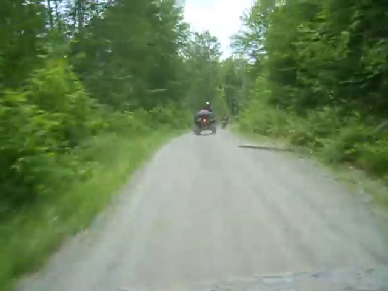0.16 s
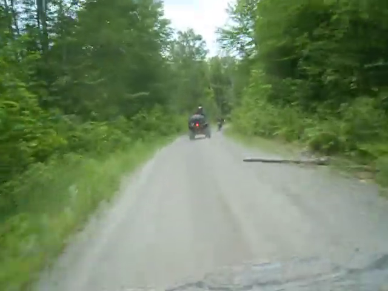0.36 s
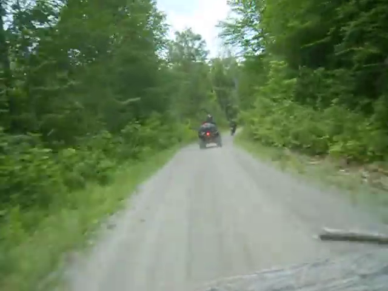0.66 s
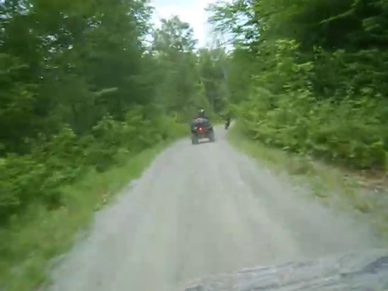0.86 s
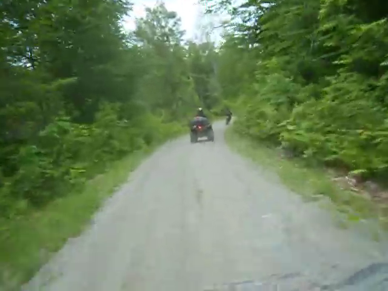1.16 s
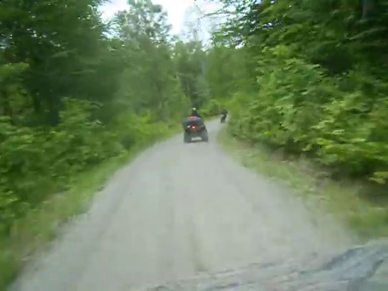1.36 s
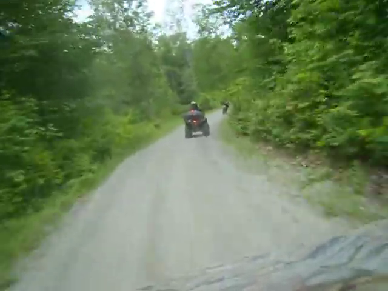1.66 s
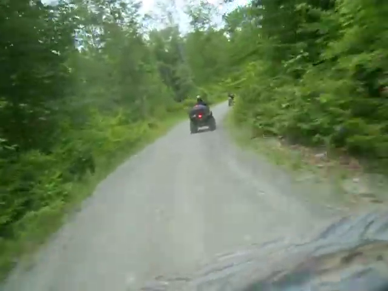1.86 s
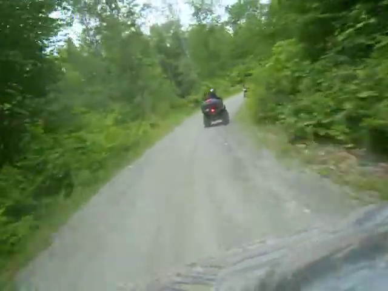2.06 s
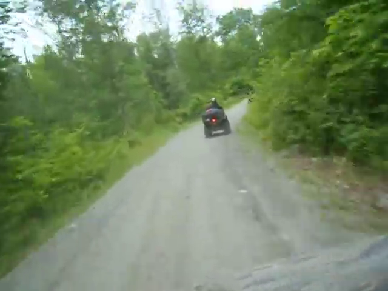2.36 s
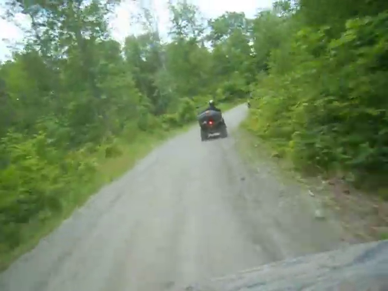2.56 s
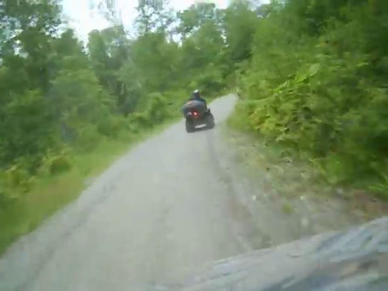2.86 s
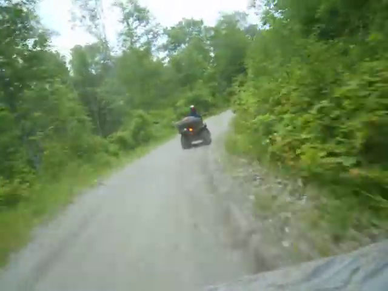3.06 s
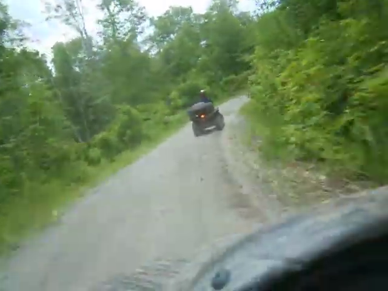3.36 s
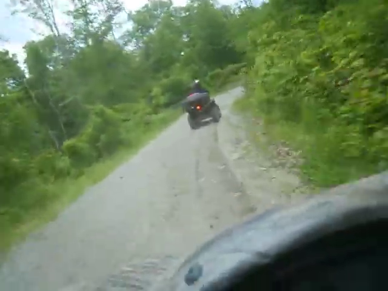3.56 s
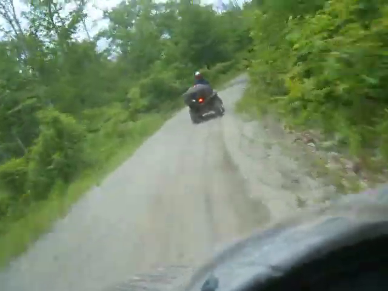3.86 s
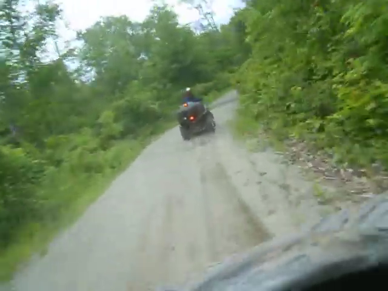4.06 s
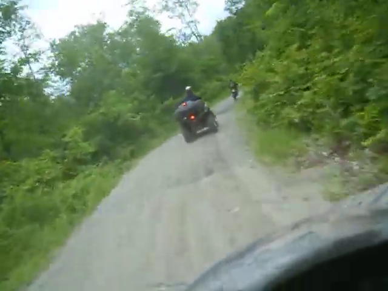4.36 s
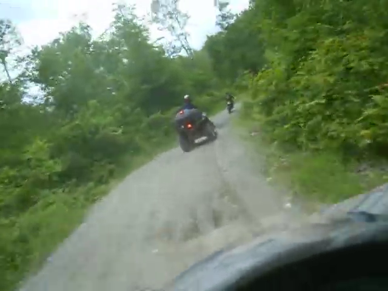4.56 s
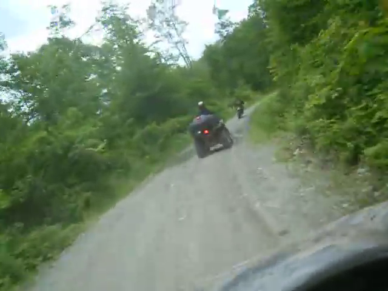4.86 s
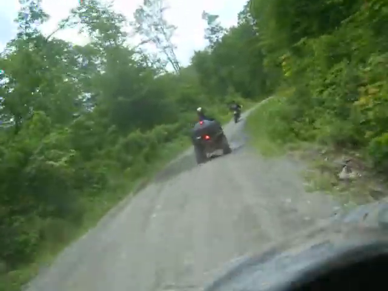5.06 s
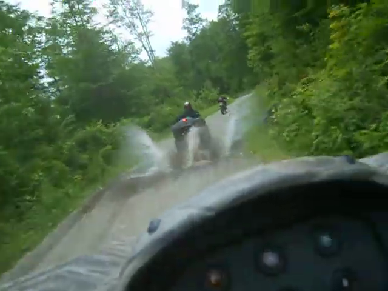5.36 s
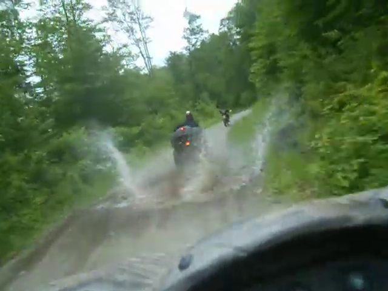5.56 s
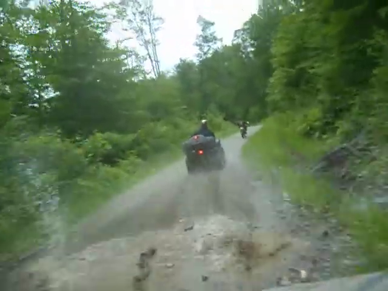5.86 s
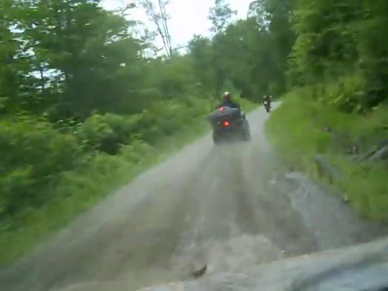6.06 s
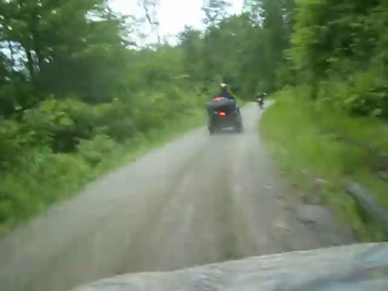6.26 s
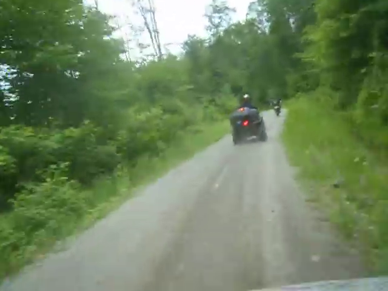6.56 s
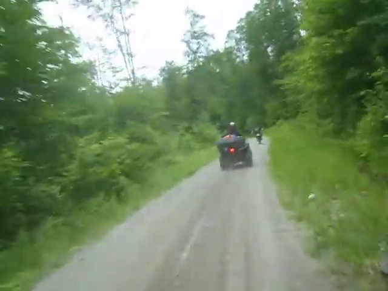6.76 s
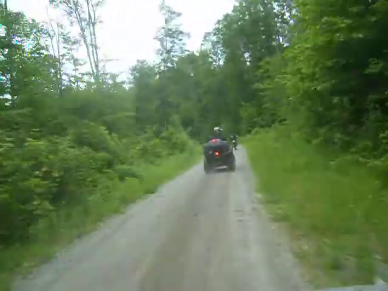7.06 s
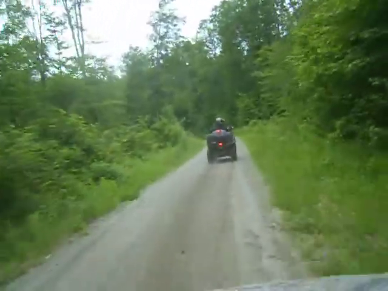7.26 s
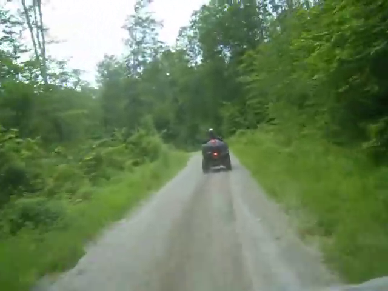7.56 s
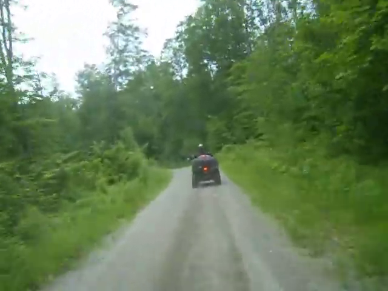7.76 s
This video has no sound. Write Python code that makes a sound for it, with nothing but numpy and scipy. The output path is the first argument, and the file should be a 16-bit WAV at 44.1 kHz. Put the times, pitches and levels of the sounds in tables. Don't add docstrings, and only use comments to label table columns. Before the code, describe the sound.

Close, from the cab of an open buggy on a gravel forest road: a twin-cylinder engine holds a high, loaded drone at first, with valve knocking, humming panels and thin whines over constant gravel hiss and low wind buffeting. At about 0.8 s a hard wind puff crackles and the throttle eases; the level ducks and slowly recovers. More wind hits cluster at 1.5-1.9 s as the engine pulls again around 2, then at 2.9. A short rev at 3.2 is followed by crackling gusts at 3.4-3.6. The engine sinks, quieter and lower, until about 5, with wind crackle near 4.8. It surges at 5.2, then closes off; a loose driveline part rattles brightly, loudest near 5.8, fading by 6.2. From 6.3 it accelerates, the drone and whines climbing loudly to the end. The sound is slightly saturated, with muted extreme treble.

```python
import sys
import numpy as np
from scipy import signal
from scipy.fft import rfft, irfft, next_fast_len
from scipy.io import wavfile
from scipy.ndimage import uniform_filter1d, map_coordinates

SR = 44100
rng = np.random.default_rng(int(sys.argv[2]) if len(sys.argv) > 2 else 0)


def attenuation_scalar(level_db):
    decades = np.asarray(level_db, float) / 20
    return 10 ** decades


def output_pcm(signal):
    pcm = np.clip(np.atleast_2d(signal).T, -1, 1) * 32767
    wavfile.write(sys.argv[1], SR, np.round(pcm).astype(np.int16))


N = 349272

# start_s, cycle_rate_hz
ENGINE_SPEED = [(0, 47.4), (.5, 47.89), (1.44, 47.52), (1.62, 45.72), (2.16, 44.83), (2.88, 43.52),
                (3.24, 47.52), (3.42, 46.76), (3.96, 40.51), (4.32, 37.8), (4.97, 35.6), (5.22, 43),
                (5.4, 46.28), (5.94, 38.59), (6.66, 43.7), (7.02, 46.75), (7.4, 47.68), (7.92, 49)]
# start_s, throttle (0-1)
PEDAL = [(0, 0.77), (.85, 0.26), (1.8, 0.32), (2.0, 0.75), (2.9, 0.52), (3.2, 0.84), (3.45, 0.45),
         (3.6, 0.31), (4.9, 0.1), (5.05, 0.71), (5.2, 1), (5.55, 0.69), (5.8, .05), (6.0, 0), (6.3, 0.55),
         (6.66, 0.78), (7.2, 0.99), (7.92, 0.96)]
# frequency_hz, level_db (per Hz)
GRAVEL_SPECTRUM = [(300, -27), (1000, 5), (2000, 1), (4200, -2), (5500, -5.5), (7000, -8.5), (9000, -10),
                   (20000, -27)]


def unit(x):
    return x / np.sqrt(np.mean(x ** 2) + 1e-20)


def curves(rows):
    s, *columns = np.transpose(rows)
    t = np.arange(N) / SR
    return [np.interp(t, s, column) for column in columns]


def wobble(rate_hz):
    at = np.arange(0, N + 16, 16)
    knots = rng.standard_normal(int(N * rate_hz / SR) + 4)
    return np.interp(np.arange(N), at, map_coordinates(knots, [at * rate_hz / SR]))


def filtered(x, response):
    m = next_fast_len(N + 8192)
    return irfft(rfft(x, m) * response(np.fft.rfftfreq(m, 1 / SR)), m)[:N]


def coloured(x, spectrum):
    hz, db = np.transpose(spectrum)
    return filtered(x, lambda f: attenuation_scalar(np.interp(np.log(f + 1), np.log(hz + 1), db)))


def rung(x, modes):
    def response(f):
        total = 0
        for k, (centre, width, db) in enumerate(modes):
            damping = 1j * f * width
            total = total + (-1) ** k * attenuation_scalar(db) * damping / (centre * centre - f * f + damping)
        return total
    return unit(filtered(x, response))


def peaks(f, modes):
    return sum(attenuation_scalar(db) / (1 + ((f - centre) / width) ** 4) for centre, width, db in modes)


def blows(turns, scatter_db, t60, click, soft):
    whole = np.floor(turns).astype(int)
    start = np.diff(whole, prepend=whole[0]) > 0
    age = (np.arange(N) - np.maximum.accumulate(np.arange(N) * start)) / SR
    size = attenuation_scalar(scatter_db * rng.standard_normal(whole.max() + 99))[whole]
    puff = attenuation_scalar(-60 * age / t60) * (1 - np.exp(-age / soft)) * rng.standard_normal(N)
    return size * (click * start + puff)


def spells(rows, rest_db):
    t = np.arange(0, N + 64, 64) / SR
    gain = attenuation_scalar(rest_db)
    for start, length, db in rows:
        gain = gain + attenuation_scalar(db) * np.exp(-(2 * (t - start) / length - 1) ** 4)
    return np.interp(np.arange(N) / SR, t, gain)


def exhaust(turns):
    # frequency_hz, half_width_hz, level_db
    pipe_modes = [(243, 41.7, 2.5), (363, 25, -12), (487, 53, -19), (614, 32, -22.5), (823, 20, -15)]
    # frequency_hz, half_width_hz, level_db (over flat)
    cab_modes = [(93.6, 5, -0.5), (190, 11, 1)]
    # frequency_hz, width_hz, level_db
    intake_modes = [(2780, 260, 0), (3900, 500, -7), (5600, 250, -9)]
    # start_s, length_s, level_db
    order_drones = [
        [(-.4, 1.5, -30), (1.0, 0.98, -26.5), (2.3, 0.69, -24), (3.55, 1.2, -21), (4.98, 0.32, -15),
         (5.3, .5, -25.5), (6.12, 0.69, -23.5)],
        [(2.2, 0.64, -29.5), (3.55, 0.4, -21), (4.0, 1.005, -16), (5.1, .35, -29), (5.65, 0.47, -23),
         (6.9, 1.2, -31.5)],
        [(.25, 0.75, -31.5), (3.2, 0.27, -31), (4.05, 0.31, -27), (4.4, .55, -25), (6.2, .3, -30)],
    ]
    # level_db (coasting), change_db (at full throttle)
    low_orders = [(-30.5, 1.4), (-42.5, 9.5), (-43, 8.2)]
    (hz,), (throttle,) = curves(ENGINE_SPEED), curves(PEDAL)
    load_db = -51 + 22 * np.abs(throttle) ** 1.66
    load = attenuation_scalar(load_db)
    low_hz = np.arange(50, 250)
    cab = 1 + peaks(low_hz, cab_modes)
    gains = {1: attenuation_scalar(load_db + 8.0)}
    for k, (coast_db, open_db) in enumerate(low_orders, 2):
        direct = attenuation_scalar(coast_db + open_db * throttle) * np.interp(k * hz, low_hz, cab)
        gains[k] = direct + spells(order_drones[k - 2], -99)
    pipe_hz = np.arange(100, 1000)
    pipe = attenuation_scalar(-22.0) + peaks(pipe_hz, pipe_modes)
    for k in range(5, 19):
        gains[k] = load * np.interp(k * hz, pipe_hz, pipe)
    turn = np.arctan2(20 * pipe_hz, 216.7 ** 2 - pipe_hz ** 2)
    unsteady = [attenuation_scalar(1.6 * wobble(12)) for _ in range(4)]
    orders = np.zeros(N)
    for k, gain in gains.items():
        lag = np.interp(k * hz, pipe_hz, turn) + .3 * max(k - 5, 0) ** 2
        orders += gain * unsteady[k % 4] * np.cos(2 * np.pi * k * turns - lag)
    intake = attenuation_scalar(-19.5) * load * rung(rng.standard_normal(N), intake_modes)
    return np.sqrt(2) * orders + intake


def whines(turns):
    # start_s, end_s, order (per engine cycle), level_db
    whine_rows = [(0, .9, 23, -42), (0, 1.45, 33, -44), (0, 1.4, 26, -45), (.3, 1.45, 20, -44),
                  (0, 1.3, 13, -42), (1.9, 2.85, 34, -48), (1.9, 2.85, 22, -41), (2, 2.4, 20, -37),
                  (1.95, 2.3, 18, -43), (2.1, 2.4, 28, -45), (3.75, 4.8, 45.5, -47), (4.2, 4.6, 38, -49),
                  (4.2, 4.6, 30, -48), (5.75, 6.3, 21.5, -44), (6.8, 7.8, 21, -37), (6.9, 7.9, 17, -40),
                  (6.9, 7.9, 19, -43), (6.1, 6.9, 14, -41), (6.2, 6.9, 13, -43), (6.55, 7.8, 23, -45),
                  (6.55, 7.4, 26, -46), (0, .8, 44.5, -49), (7.45, 7.8, 37, -44)]
    out, unsteady = np.zeros(N), attenuation_scalar(1.5 * wobble(15))
    for start, end, order, db in whine_rows:
        span = slice(round(start * SR), round(end * SR))
        fade = signal.windows.tukey(len(turns[span]), .2)
        own_wobble = np.roll(unsteady, round(999 * order))[span]
        out[span] += attenuation_scalar(db) * fade * own_wobble * np.sin(2 * np.pi * order * turns[span])
    return out


def valve_knock(turns):
    # frequency_hz, width_hz, level_db
    knock_modes = [(1150, 190, -2), (1350, 200, -30), (1560, 160, 0), (1750, 150, -6)]
    # start_s, length_s, level_db
    knock_spells = [
        (-.6, 1.96, -37.5),
        (3.05, 0.087, -33),
        (3.2, 0.25, -41.5),
        (5.12, 0.15, -30.5),
        (5.4, 0.23, -42),
        (6.0, .25, -42.5),
        (6.56, 0.28, -34),
        (7.3, 0.46, -44),
    ]
    tap = uniform_filter1d(blows(turns, scatter_db=.6, t60=.03, click=60, soft=.001), size=9)
    return spells(knock_spells, rest_db=-51) * rung(tap, knock_modes)


def panel_hum(turns):
    # frequency_hz, width_hz, level_db
    low_modes = [(473.8, 14, 5), (623, 140, -9), (910, 160, -25), (1084.6, 29, -2), (1286, 20, -13),
                 (2150, 8.7, -19), (2444, 41, -21.5)]
    high_modes = [(703, 9.1, -5), (781, 91, 2.5), (1006.5, 27, 9), (1290, 110, -4.5), (1920, 110, -16),
                  (2678, 40, -7.5), (4300, 270, -18), (5630, 130, -26)]
    # start_s, length_s, level_db
    low_spells = [(.1, 0.92, -29), (1.1, 0.33, -38), (2.2, 0.73, -38), (3.05, 0.49, -33.5), (4.0, .75, -40),
                  (6.2, 0.24, -38), (6.7, 0.16, -40), (7.7, 0.28, -38)]
    high_spells = [(-.4, 1.48, -40), (1.2, 0.47, -39), (2.15, 0.2, -46), (2.9, 0.57, -43.5),
                   (3.9, 0.96, -55.5), (5.1, 0.33, -41), (6.0, .5, -39.5), (6.87, 1.02, -42.5)]
    low_shake = blows(turns, scatter_db=1, t60=.2, click=80, soft=.002)
    high_shake = blows(turns + .4, scatter_db=1, t60=.2, click=70, soft=.002)
    low = spells(low_spells, -48) * rung(low_shake, low_modes)
    high = spells(high_spells, -50) * rung(high_shake, high_modes)
    return low + high


def gear_noise(turns):
    # frequency_hz, level_db (per Hz)
    gear_spectrum = [(60, -23), (200, -3.5), (450, -1), (800, -8.5), (1200, -13), (1700, -14),
                     (2100, -24.5), (4000, -49), (9000, -91.5)]
    gear_db = -30.5 - 3 * curves(PEDAL)[0]
    firings = blows(2 * turns, scatter_db=1, t60=.3, click=5, soft=.001)
    gears = attenuation_scalar(gear_db) * unit(coloured(firings, gear_spectrum))
    swell = 1 + 0.087 * np.cos(4 * np.pi * turns) + 0.06 * np.cos(2 * np.pi * turns)
    hiss = attenuation_scalar(gear_db - 9) * unit(coloured(swell * rng.standard_normal(N), GRAVEL_SPECTRUM))
    return gears + hiss


def engine():
    turns = np.cumsum(curves(ENGINE_SPEED)[0] * (1 + .0015 * wobble(14))) / SR + .47
    return exhaust(turns) + whines(turns) + valve_knock(turns) + panel_hum(turns) + gear_noise(turns)


def road():
    grit = rng.standard_normal(N) * attenuation_scalar(1.6 * wobble(900) + 1.3 * wobble(9))
    return attenuation_scalar(-42.5) * unit(coloured(grit, GRAVEL_SPECTRUM))


def wind():
    # start_s, level_db
    buffet_rows = [(0, -34), (.15, -20), (.28, -29), (.38, -20), (.6, -28.5), (.8, -25.5), (1.1, -30.5),
                   (1.75, -26.5), (2.0, -29), (2.7, -28.5), (3.4, -25.5), (3.7, -33.5), (4.9, -29.5),
                   (5.27, -25), (5.9, -30), (6.2, -35.5), (7.0, -31.5), (7.92, -25)]
    # start_s, length_ms, crackle_db, swing_db
    gusts = [(.82, 12, -20, -12), (.836, 4, -18, -16), (.842, 6, -18, -5), (1.497, 10, -23, -8),
             (1.607, 11, -26, -9), (1.73, 7, -23, -18), (1.738, 13, -22, -8), (1.757, 8, -28, -9),
             (1.772, 10, -26, -7), (1.791, 5, -29, -14), (1.866, 4, -33, -14), (2.883, 9, -25, -14),
             (2.894, 10, -24, -8), (2.91, 8, -26, -7), (2.929, 4, -24, -16), (3.434, 7, -20, -18),
             (3.455, 14, -29, -20), (3.473, 6, -22, -8), (3.497, 14, -23, -7), (3.532, 13, -24, -11),
             (3.553, 15, -21, -7), (3.576, 8, -24, -16), (3.645, 3, -33, -20), (3.822, 3, -34, -26),
             (4.113, 10, -27, -14), (4.809, 3, -29, -18), (4.829, 5, -27, -14), (4.856, 6, -27, -12),
             (4.889, 4, -26, -16), (4.905, 15, -32, -14)]
    squalls = [
        (1.73, 70, -29, -35.5),
        (2.881, 44, -28, -34.5),
        (3.43, 71, -37, -34),
        (4.82, 105, -31, -46.5),
        (4.7, 50, -39.5, -24),
        (4.45, 58, -39, -22),
        (.11, 18, -37, -10),
        (.35, 18, -34.5, -13),
        (.77, 13, -37.5, -10.5),
        (0.92, 16, -44, -18.5),
    ]
    # frequency_hz, level_db (per Hz)
    rumble_spectrum = [(8, -31), (22, 2), (45, -3), (80, -10.5), (130, -12.5), (220, -20.5), (400, -32.5),
                       (800, -43), (3000, -85.5)]
    crackle_spectrum = [(60, -13), (200, 6.5), (800, -13), (1700, -17.5), (3000, -19), (7000, -29.5),
                        (12000, -31.5)]
    thud_spectrum = [(60, -17.5), (200, 0), (700, -3), (1500, -13.5), (3500, -24), (8000, -37)]
    rumble = coloured(rng.standard_normal(N), rumble_spectrum)
    rumble = rumble / np.sqrt(np.abs(uniform_filter1d(rumble ** 2, size=5000)))
    crackle, swing = np.zeros(N), np.zeros(N + SR)
    for s, ms, crackle_db, swing_db in gusts + squalls:
        first, n = round(s * SR), round(ms * SR / 1000)
        crackle[first:first + n] += attenuation_scalar(crackle_db) * np.hanning(n) ** .4
        t = np.arange(SR // 8) / SR - ms / 1000
        dip = -np.sin(np.pi / 2 * np.clip(1 + t * 1000 / ms, 0, 1)) * (t < 0)
        rebound = 1.2 * np.exp(-(t / .011) ** 2) * np.cos(2 * np.pi * 20 * t) * (t >= 0)
        swing[first:first + len(t)] += attenuation_scalar(swing_db) * uniform_filter1d(dip + rebound, size=110)
    spikes = unit(coloured(rng.standard_normal(N) * attenuation_scalar(1.6 * wobble(700)), crackle_spectrum))
    thuds = unit(coloured(rng.standard_normal(N) * attenuation_scalar(3 * wobble(250)), thud_spectrum))
    buffeting = attenuation_scalar(curves(buffet_rows)[0] + 8.5 + 3.94 * wobble(8.1)) * rumble
    overload = 1.2 * crackle * thuds + 3.27 * crackle ** (4 / 3) * spikes
    return buffeting + overload + swing[:N]


def driveline():
    # start_s, shaft_rate_hz, rattle_db
    shaft_rows = [
        (4.55, 37.8, -49.5),
        (5.02, 40.13, -44),
        (5.2, 42.34, -39),
        (5.45, 45.67, -44.5),
        (5.8, 46.78, -29.5),
        (6.02, 45.81, -37.5),
        (6.2, 43.8, -53.5),
        (6.45, 42.05, -44.5),
        (6.8, 42.67, -48.5),
    ]
    # frequency_hz, width_hz, level_db
    part_modes = [(2540, 850, 1), (4490, 920, 2.5), (5460, 700, 2), (6440, 630, -2), (8360, 870, -1)]
    hz, db = curves(shaft_rows)
    turns = np.cumsum(hz) / SR + 0.96
    return attenuation_scalar(db) * rung(blows(turns, scatter_db=.6, t60=.024, click=0, soft=.0016), part_modes)


def gain_control():
    # start_s, gain_db (just after)
    duck_rows = [(0.402, -3), (0.862, -10.5), (1.5, -5), (1.78, -9), (2.92, -4), (3.551, -10), (4.12, -10),
                 (4.87, -5), (5.3, -4), (5.569, -6)]
    recovery_db_per_s, duck_s = 6, 0.013
    t = np.arange(N) / SR
    db = np.zeros(N)
    for s, after_db in duck_rows:
        recovering = np.minimum(after_db + recovery_db_per_s * (t - s), 0)
        db = np.minimum(db, np.where(t < s, 0, recovering))
    return attenuation_scalar(uniform_filter1d(db, size=round(duck_s * SR)))


def scene():
    effort = attenuation_scalar(-2.5 + 7.5 * curves(PEDAL)[0])
    vehicle = engine() + driveline() + road()
    return (gain_control() * effort * vehicle + wind())[None]


def band_limit(x):
    return signal.sosfilt(signal.butter(12, 8820, fs=SR, output="sos"), x)


def record(dry):
    # frequency_hz, level_db
    microphone_response = [(10, -5), (25, -3.5), (7300, 0.5), (7700, -9), (8000, -20.5), (8600, -19.5),
                           (9000, -38.5), (9300, -90), (22000, -120)]
    soft = dry[0] / (1 + np.abs(dry[0] / .7) ** 4) ** (1 / 4)
    mix = coloured(soft, microphone_response)[None]
    return band_limit(mix)


dry = scene()
out = record(dry)
output_pcm(out)
```